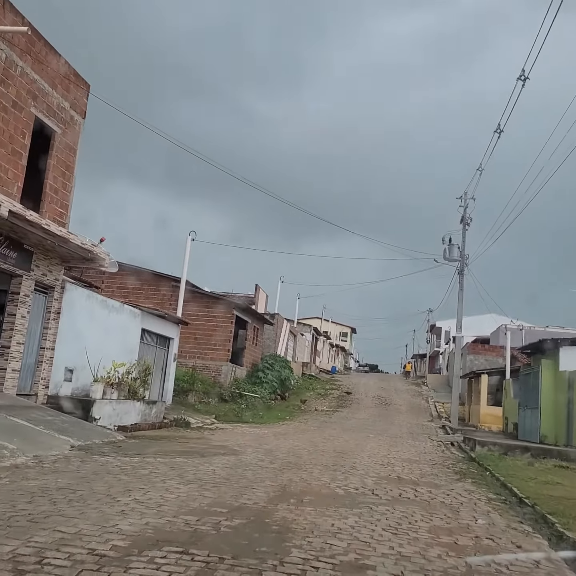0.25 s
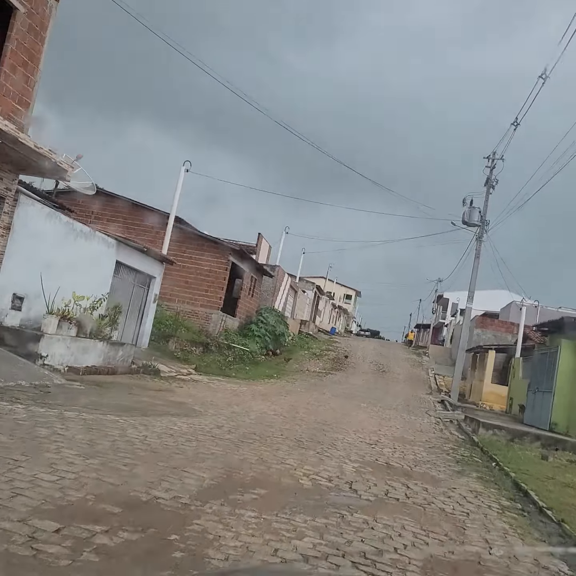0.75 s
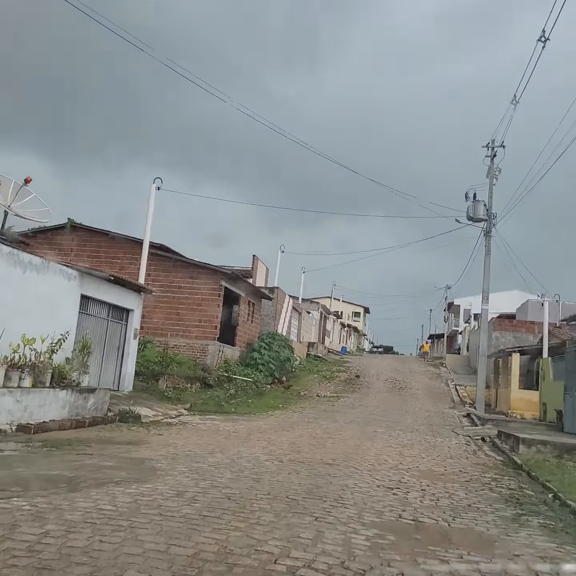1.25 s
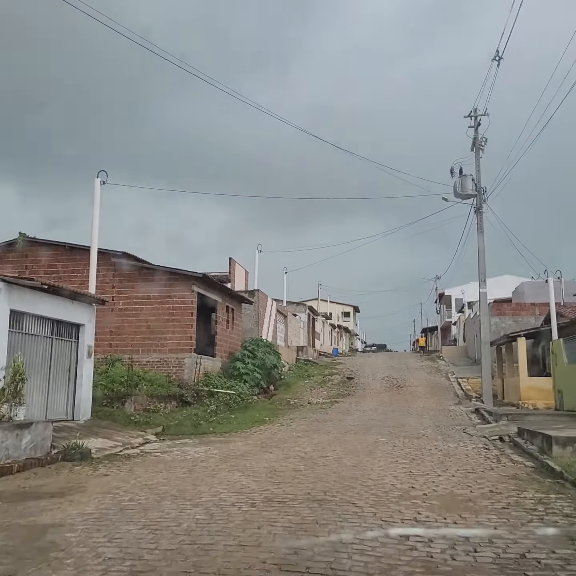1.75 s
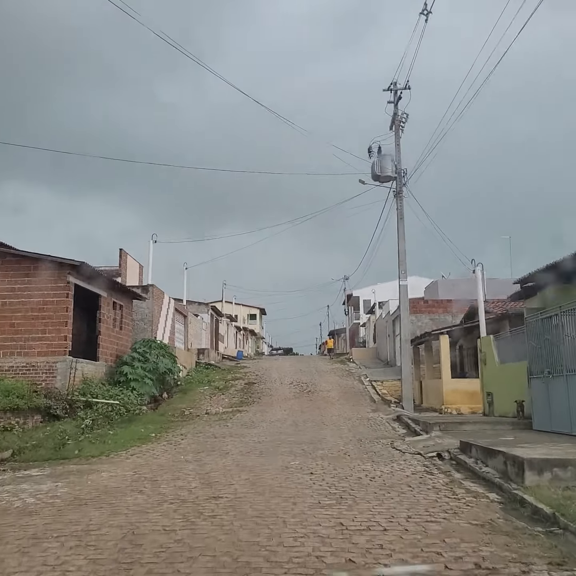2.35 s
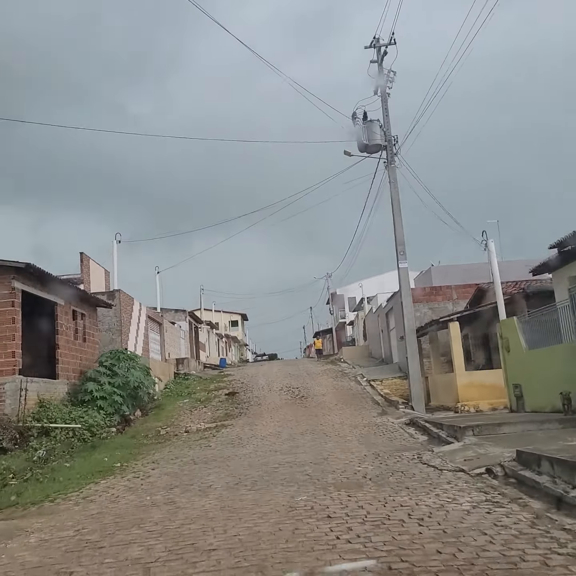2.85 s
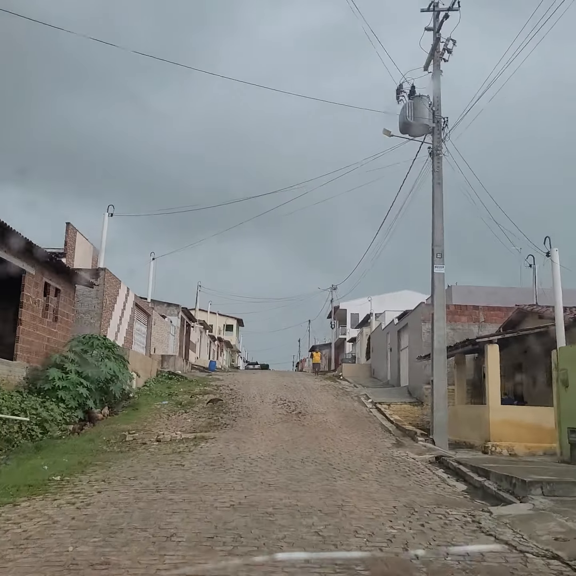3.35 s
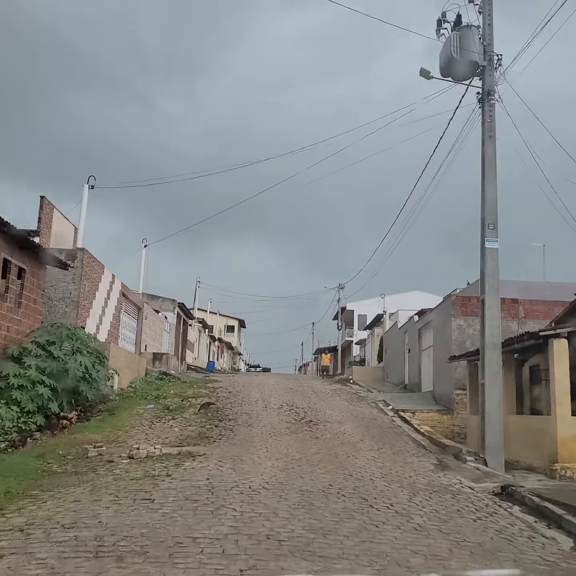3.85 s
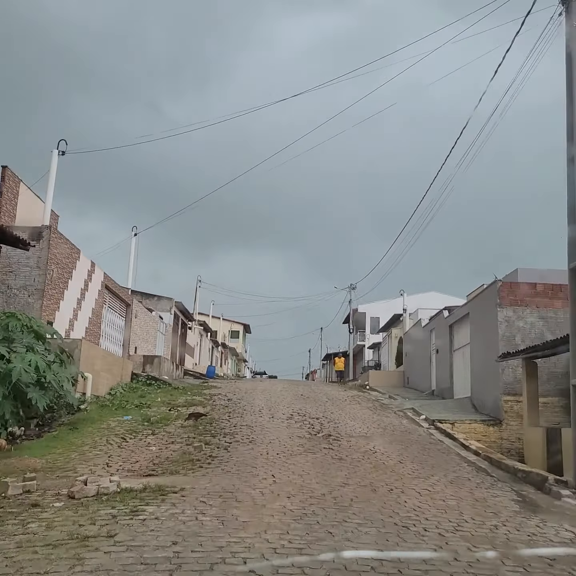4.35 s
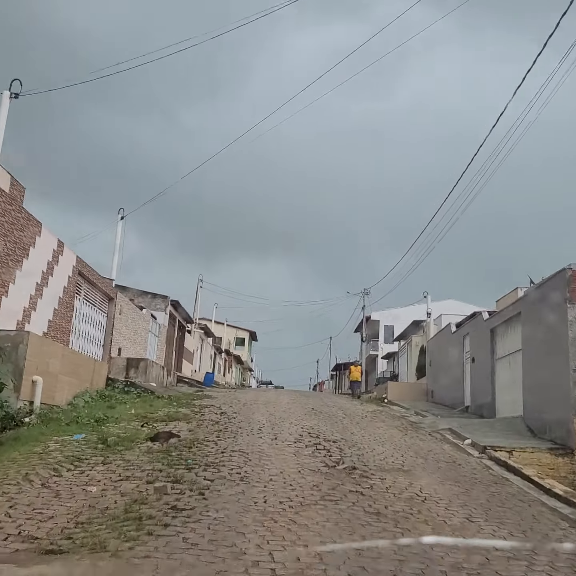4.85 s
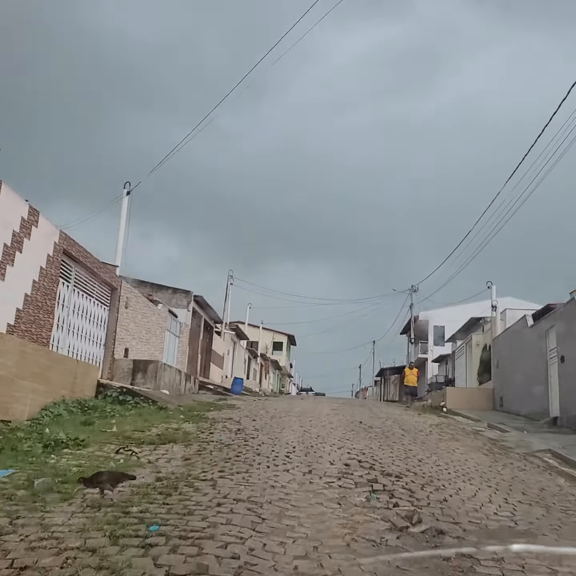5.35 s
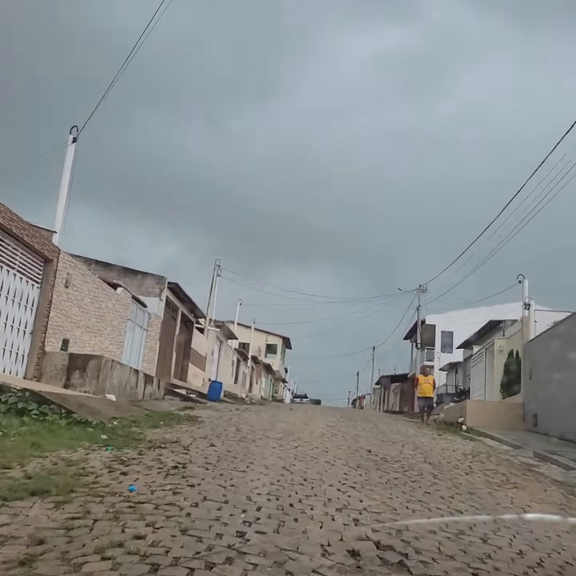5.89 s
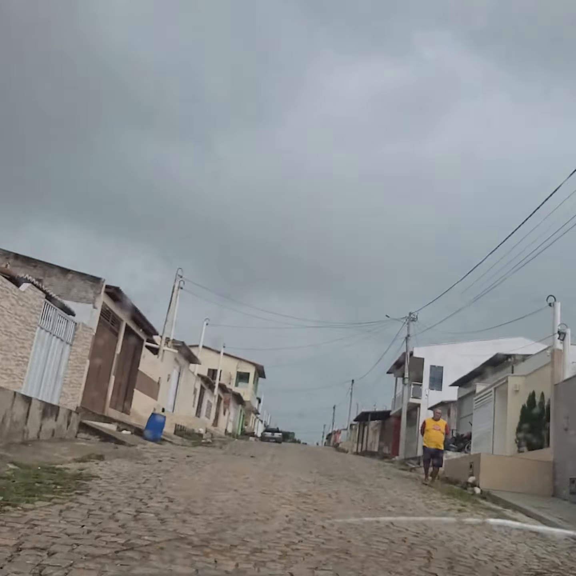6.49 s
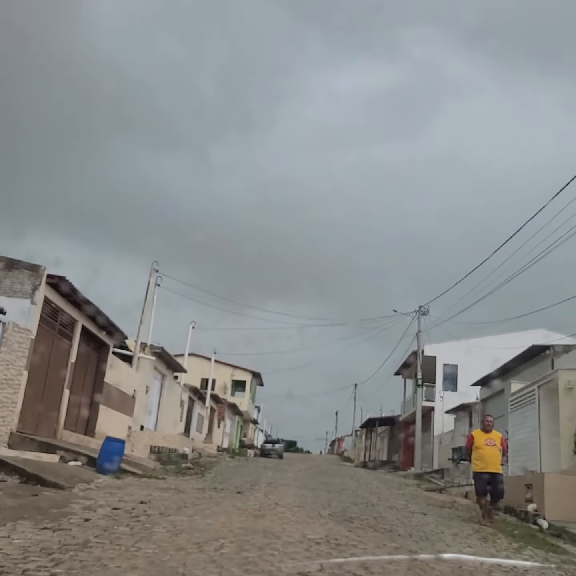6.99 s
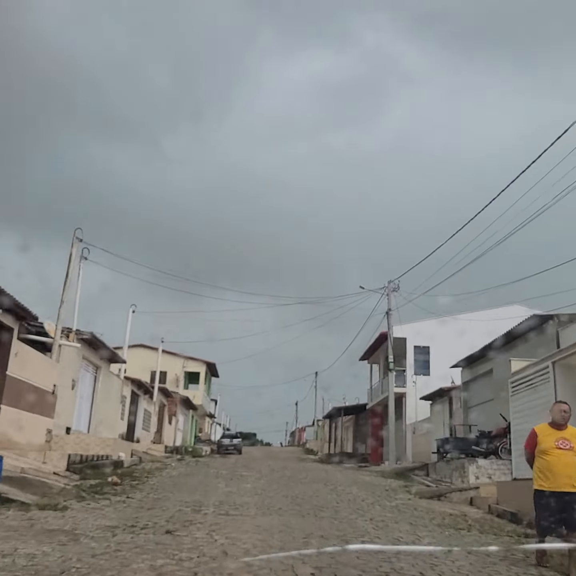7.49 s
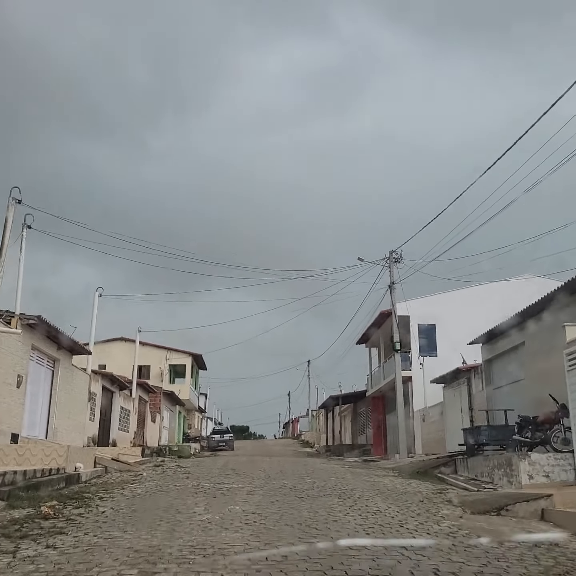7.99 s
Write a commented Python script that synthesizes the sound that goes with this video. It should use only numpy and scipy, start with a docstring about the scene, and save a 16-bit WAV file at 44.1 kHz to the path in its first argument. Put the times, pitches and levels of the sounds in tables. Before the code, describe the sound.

Inside a car crawling uphill over cobblestones: steady deep tyre rumble and cabin boom, with loose metal clinks, plastic rattles and occasional suspension thumps.

```python
"""Cobbles drum under four tyres and the closed cabin booms, heard from inside a car climbing at a steady crawl.
The boom swells over each hump; proud stones thump through suspension and floor, and tyres crunch off edges.
Rough patches set off bouts of rattling: a loose metal fitting on the right clinks in runs of separate taps,
a smaller part pings, and the plastic trim buzzes, ticks and squeaks. Two microphones pick it up.
Impulses and puffs of noise excite coloured filters and decaying modes; each squeak is a wavering sine."""
import sys
import numpy as np
from scipy import signal
from scipy.fft import rfft, irfft, next_fast_len
from scipy.io import wavfile
from scipy.ndimage import uniform_filter1d

SR = 44100
rng = np.random.default_rng(int(sys.argv[2]) if len(sys.argv) > 2 else 0)


def transcribe(u):
    """Save the signal u as a 16-bit wav file named by the first command-line argument.

    u: samples, shape (n,) or (channels, n), limited to [-1, 1]; the rate is SR.
    q: integer samples, one column per channel.
    """
    v = np.clip(np.atleast_2d(u).T, -1, 1)
    q = np.round(v * 32767).astype(np.int16)
    wavfile.write(sys.argv[1], SR, q)


N = 362943
TIME = np.arange(N) / SR  # s

# Roughness of the road under the tyres. Each row: time in seconds, drumming level in dB.
ROAD = [(0, -25), (.5, -27.5), (.65, -24), (.95, -28), (1.35, -23), (1.7, -28), (2.1, -24), (2.5, -27.5),
        (2.98, -21.5), (3.4, -26.5), (3.75, -23), (4.25, -22.5), (4.9, -24), (5.4, -24), (5.68, -27.5),
        (5.95, -21.5), (6.5, -22.5), (6.95, -26.5), (7.5, -25.5), (8.17, -23.5)]
# Humps in the paving that swell the cabin boom. Each row: centre in seconds, level in dB.
HUMPS = [(.1, -19), (0.261, -14.5), (.79, -18), (1.07, -18), (1.22, -15.5), (1.49, -13), (1.691, -14.5),
         (2.331, -16.5), (2.72, -13.5), (2.94, -14), (3.139, -12.5), (3.36, -14.5), (3.63, -17.5),
         (3.77, -14.5), (3.99, -14), (4.21, -12.5), (4.39, -11.5), (4.57, -12), (4.92, -13.5), (5.18, -13),
         (5.42, -14.5), (5.58, -18), (5.75, -13.5), (5.91, -13.5), (6.07, -12), (6.27, -12), (6.43, -13),
         (6.63, -15), (6.86, -14), (7.07, -13), (7.27, -17.5), (7.529, -16), (7.701, -15.5), (7.851, -12),
         (8.05, -14)]
# Cabin air boom. Each row: frequency in Hz, relative level in dB.
BOOM = [(12, -33.5), (23, -23), (36, -16), (46, -2.5), (55, 0.5), (65, -6.5), (79, -14), (105, -24.5)]
# Floor and body panels. Each row: frequency in Hz, relative level in dB.
BODY = [(60, -22.5), (95, -1.5), (134, 3), (176, -10), (232, -14.5), (284, -13.5), (380, -24), (600, -31),
        (760, -45.5), (1100, -56)]
# Road noise that has bounced around the cabin. Each row: frequency in Hz, relative level in dB.
ROAR = [(40, 3.5), (280, -3), (560, -8.5), (760, -13.5), (870, -11), (1200, -21), (3000, -29),
        (7000, -46.5)]
# Bouts of rattling, each set off by a patch of rough stones. Each row: start in seconds, length in seconds,
# trim buzz in dB, fine sizzle of rubbing panels in dB relative to the buzz (before SIZZLE_GAIN_DB).
RATTLES = [(.235, 0.067, -48.5, -21.5), (0.483, 0.14, -54.5, -25), (1.09, 0.1, -48.5, -23),
           (1.351, 0.093, -48.5, -24), (2.07, .1, -49.5, -28), (2.57, .22, -48, -31),
           (2.983, 0.18, -50, -27), (3.301, 0.15, -49.5, -30), (3.793, .15, -47, -29),
           (4.185, 0.17, -47, -22), (4.404, 0.065, -49.5, -24), (4.591, 0.21, -48.5, -23.5),
           (5.978, 0.2, -50, -26), (6.263, 0.14, -52, -28), (6.403, .12, -45.5, -26),
           (6.983, 0.27, -50.5, -26), (7.722, 0.21, -50, -28.5), (8.068, 0.1, -48, -25.5)]
# Buzzing plastic trim. Each row: frequency in Hz, relative level in dB.
TRIM = [(700, -2), (1400, 4.5), (2400, -4.5), (3200, -4.5), (3900, -8), (4500, -12), (6400, -15.5),
        (7400, -13.5), (8400, -28)]
# Fine sizzle of rubbing panels. Each row: frequency in Hz, relative level in dB.
SIZZLE = [(4000, -38), (8000, -9.5), (11000, -1.5), (16000, -6.5)]
# Hard contact. Each row: frequency in Hz, relative level in dB.
SNAP = [(600, -9.5), (1800, -3.5), (3100, 3.5), (3800, -3), (4300, -4.5), (5000, -4), (5900, -8),
        (6700, -12.5), (7500, -7), (8600, -14.5)]
# Plastic panels snapping together. Each row: start in seconds, relative level in dB, relative brightness in dB.
TICKS = [(0.38, -51, -8), (1.1087, -39.5, -28), (1.353, -43.5, -37), (1.4187, -41.5, -13),
         (3.124, -44, -14), (3.862, -43, -12), (4.047, -43, -28), (4.6526, -42, -34), (4.75, -45.5, -25),
         (6.11, -42, -34), (6.272, -41, -21), (6.495, -43, -22), (6.7337, -42.5, -16), (7.786, -45.5, -20)]
# Taps of the loose fitting on its seat. Each row: start in seconds, relative level in dB,
# relative hardness of the contact in dB.
CLINKS = [(.12, -38, -3.5), (0.137, -37.5, -5), (.207, -41, -1.5), (.239, -41.5, 2), (0.265, -43.5, 3.5),
          (0.306, -40, -4), (.836, -44.5, -0.5), (.873, -47.5, 0.5), (1.444, -38.5, -8), (1.467, -41, -5.5),
          (1.526, -47.5, -.5), (1.571, -38.5, -2), (1.592, -36.5, -1.5), (1.644, -35, -10.5),
          (1.658, -38, -13), (1.67, -36.5, -10), (1.685, -39.5, -5.5), (1.697, -41, -15), (1.72, -41, -9),
          (1.755, -44, -6), (1.894, -41.5, -23), (1.929, -40.5, -18), (1.956, -38, -13), (2.039, -37, -14),
          (2.083, -33.5, -7.5), (2.148, -30.5, -10.5), (2.165, -33, -4.5), (2.197, -37.5, -8),
          (2.24, -38, -19), (2.263, -38, -7), (2.482, -36, -10), (2.5, -41, -3), (2.568, -40.5, -7.5),
          (2.594, -36, -5.5), (2.666, -35, -4.5), (2.703, -34.5, -6), (2.734, -36, -9), (2.8, -40, -10.5),
          (2.923, -30.5, -9), (2.963, -37, -20), (2.994, -34.5, -12), (3.016, -29, -17.5), (3.086, -31, -8),
          (3.277, -39, -18), (3.332, -37.5, -17), (3.426, -36, -14.5), (3.521, -41, -10.5),
          (3.617, -44.5, -25), (3.67, -36, -8.5), (3.692, -33.5, -9), (3.716, -41, -4), (3.781, -39.5, -9),
          (3.806, -31, -8.5), (3.92, -42, -14), (4.118, -42.5, -6), (4.244, -34.5, -12.5), (4.28, -37, -9),
          (4.306, -38, -3), (4.568, -40.5, -11), (4.819, -38, -6), (4.914, -43.5, -2), (4.938, -37, -10),
          (5.129, -44.5, -1.5), (5.254, -44, -5), (5.412, -37, -2), (5.435, -37, -6), (5.518, -36.5, -10),
          (5.607, -38, -5.5), (5.771, -42, -8), (5.793, -38, -2), (6.013, -33.5, -5), (6.05, -36, 2),
          (6.128, -42, 2.5), (6.192, -39.5, -4.5), (6.306, -41.5, -2), (6.45, -39, -1.5),
          (6.502, -37.5, -4.5), (6.587, -43, -5.5), (6.608, -40, 0.5), (6.708, -42.5, -1), (6.8, -42, 0),
          (6.844, -40.5, -5.5), (6.9, -41.5, -6), (6.958, -44.5, -5), (7.017, -41, -5.5),
          (7.107, -37.5, -10), (7.33, -39, -6.5), (7.45, -37.5, -6.5), (7.475, -43, -4), (7.498, -41.5, -6),
          (7.645, -42.5, -3.5), (7.742, -36.5, -7), (7.895, -37, -12), (8.079, -37, -9), (8.108, -39, -5),
          (8.185, -41.5, -7)]
# Modes of the fitting. Each row: frequency in Hz, relative level in dB.
FITTING_MODES = [(1190, -3), (1245, 1), (1365, -7), (1610, -13), (1786, -11.5), (2010, -15), (2690, -6),
                 (3195, -3.5), (3730, -11.5), (4920, -13), (6072, -20), (7260, -20)]
# Pings of a smaller metal part. Each row: start in seconds, relative level in dB.
PINGS = [(0.787, -41), (1.625, -40)]
# Modes of the smaller part. Each row: frequency in Hz, relative level in dB.
PING_MODES = [(2283, -5), (4315, -6), (5820, -5.5), (7450, -13)]
# Left minus right level of the dashboard sounds. Each row: frequency in Hz, difference in dB.
DASH_PAN = [(1200, -5), (7200, -11), (8600, 1), (20000, -1.5)]
# Jolts from proud stones. Each row: start in seconds, suspension knock in dB, floor drum in dB, cabin boom in dB.
JOLTS = [(1.089, -12.5, -19.5, -23), (1.353, -18, -16, -7.5), (4.647, -22, -17.5, -2.5),
         (6.039, -37, -12.5, -25.5), (6.101, -26, -11, -22), (6.757, -40, -15, -19)]
# Suspension knock. Each row: frequency in Hz, relative level in dB.
KNOCK = [(70, -12.5), (125, -16.5), (170, -12.5), (225, 6), (275, 2), (350, -10), (430, -8.5), (620, -28)]
# Squeaks of the trim. Each row: start in seconds, length in seconds, pitch in Hz, level in dB.
SQUEAKS = [(1.352, .02, 9420, -55), (8.087, .02, 9300, -54)]
# A tyre scrubbing off a stone's edge. Each row: start in seconds, relative level in dB.
CRUNCHES = [(1.353, -24.5), (2.07, -28), (3.075, -25.5), (4.621, -21.5), (6.125, -21), (6.43, -23),
            (7.071, -31)]
# Tyre crunch. Each row: frequency in Hz, relative level in dB.
CRUNCH = [(200, -8.5), (500, 2), (1600, -12.5), (4000, -21)]

STONES_PER_S = 42  # under each tyre, from the median gap
# time from a swell's peak until its power falls to 1/e, and the boom between swells
HUMP_S, REST_BOOM_DB = .072, -27
# the boom at the left microphone against the right: phase lead, level
BOOM_LEAD_RAD, BOOM_PAN_DB = .43, -2.9
# a bout starts abruptly, sags and dies away
RATTLE_ATTACK_S, RATTLE_RELEASE_S, RATTLE_SAG_DB_PER_S = .0089, .0031, 9.5
# the panels only begin to rub once a bout is under way; a common lift of the sizzle
SIZZLE_ONSET_S, SIZZLE_GAIN_DB = .015, 10
# murmur between bouts (sizzle before SIZZLE_GAIN_DB), and dB of murmur per dB of drumming
REST_BUZZ_DB, REST_SIZZLE_DB, BUZZ_PER_DRUM, SIZZLE_PER_DRUM = -55, -83.5, .38, 1.2
# slaps of the fluttering panels: rate from the median gap, unevenness in dB
SLAPS_PER_S, SLAP_SCATTER_DB = 90, 2.2
RING_T60_S, CRACK_T60_S, BUZZ_T60_S = .07, .028, .05
RING_DB, CRACK_DB = -2.2, -1.5
CHATTER_DB = 7.5  # loudest light chatter above the trim buzz
# a tap's bounces: when the seat starts to choke the ring, how fast, gain from one bounce to the next
TAP_S, CHOKE_S, BOUNCE_DB = .017, .009, -2
# spread from tap to tap, reached in full by modes from 2500 Hz up: tuning (share), strength
SEAT_DETUNE, SEAT_SCATTER_DB = .018, 2.5
PING_T60_S, PING_CRACK_DB = .042, 6
SHUDDER_S = .0077  # between a shuddering tyre's blows on the floor
# body panels rumbling on after a knock: decay, level against the knock
PANEL_T60_S, PANEL_DB = .45, -39
CRUNCH_T60_S = .38
TOP_HZ = 15800


def undb(db):
    """Decibels to gain."""
    return 10 ** (np.asarray(db) / 20)


def unit(x):
    """Scale to rms 1."""
    return x / np.sqrt(np.mean(x ** 2))


def pan(db):
    """Left and right gains for a left-minus-right level difference."""
    return undb(np.array([[db], [-db]]) / 2)


def colour(x, points):
    """Causal minimum-phase filter through the (Hz, dB) points, falling steeply above the last one."""
    size = next_fast_len(N + SR // 2, True)
    hz, db = np.transpose(points)
    f = np.maximum(np.arange(size // 2 + 1) * SR / size, 1)
    fall_db = np.minimum(24 * np.log2(np.maximum(f / hz[-1], 1)), 100)
    response_db = np.interp(np.log(f), np.log(hz), db) - fall_db
    # folding the cepstrum onto positive times makes the filter causal
    cepstrum = irfft(np.log(undb(response_db)))
    cepstrum[1:size // 2] *= 2
    cepstrum[size // 2 + 1:] = 0
    response = np.exp(rfft(cepstrum))
    return irfft(rfft(x, size) * response)[..., :x.shape[-1]]


def steady(x, span_s):
    """Even out swells slower than span_s, to about rms 1."""
    power = np.mean(np.atleast_2d(x) ** 2, axis=0)
    local_power = np.abs(uniform_filter1d(power, int(span_s * SR)))
    return x / np.sqrt(local_power + 1e-12)


def blows(times, sizes):
    """A track of single impulses."""
    return np.bincount(np.clip(times * SR, 0, N).astype(int), sizes, N + 1)[:N]


def scrape(x, t60):
    """Every contact grinds briefly: a dying puff of fresh noise at each microphone."""
    keep = undb(-60 / (t60 * SR))
    power = signal.lfilter([1], [1, -keep ** 2], x ** 2)
    return np.sqrt(power) * rng.standard_normal((2, N))


def standing(x):
    """The cabin's standing wave reaches the left microphone weaker and a little early."""
    lead = np.exp(1j * np.array([[BOOM_LEAD_RAD], [0]]))
    return pan(BOOM_PAN_DB) * np.real(signal.hilbert(x) * lead)


def cobbles(scatter_db):
    """Each of four tyres meets an uneven row of stones, stepping up or down at every joint."""
    gap, step, strength = np.moveaxis(rng.standard_normal((4, 600, 3)), -1, 0)
    times = np.cumsum(np.exp(.35 * gap), axis=1) / STONES_PER_S - .1
    sizes = np.sign(step) * undb(scatter_db * strength) * (times > 0)
    return blows(times.ravel(), sizes.ravel())


def heaves():
    """Level of the cabin boom in dB: it swells and falls back each time the car rides over a hump."""
    swells = sum(undb(db) ** 2 * np.exp(-((TIME - s) / HUMP_S) ** 2) for s, db in HUMPS)
    return 10 * np.log10(undb(REST_BOOM_DB) ** 2 + swells)


def tyres(boom_db, drum_db):
    """Stone blows drive the cabin's lowest air mode and the floor panels; the tread scuffs on every stone."""
    boom = steady(colour(cobbles(scatter_db=4.5), BOOM), span_s=.11)
    drum = steady(colour(cobbles(scatter_db=2), BODY), span_s=.14)
    scuffs = scrape(cobbles(scatter_db=7), t60=.24)
    roar = steady(colour(scuffs, ROAR), span_s=.3)
    road = pan(-.1) * drum + undb(-13.5) * roar
    return standing(boom * undb(boom_db)) + road * undb(drum_db)


def shaking(drum_db):
    """Buzz and sizzle levels in dB: bouts of rattling over a murmur that grows as the tyres drum harder."""
    rough_db = drum_db - drum_db.mean()
    buzz = undb(REST_BUZZ_DB + BUZZ_PER_DRUM * rough_db) ** 2
    sizzle = undb(REST_SIZZLE_DB + SIZZLE_PER_DRUM * rough_db) ** 2
    for s, length, buzz_db, sizzle_db in RATTLES:
        age = np.clip(TIME - s, 0, 1)
        attack = np.minimum(age / RATTLE_ATTACK_S, 1)
        release = np.exp(-np.maximum(age - length, 0) / RATTLE_RELEASE_S)
        sagging_db = buzz_db - RATTLE_SAG_DB_PER_S * (age - length / 2)
        power = (attack * release * undb(sagging_db)) ** 2
        rubbing = undb(sizzle_db) * (1 - np.exp(-age / SIZZLE_ONSET_S))
        buzz = buzz + power
        sizzle = sizzle + power * rubbing ** 2
    return 10 * np.log10(buzz), 10 * np.log10(sizzle)


def flutter():
    """Loose panels slap at uneven moments; each slap jumps up and dies away."""
    gap, size = rng.standard_normal((900, 2)).T
    times = np.cumsum(np.exp(.5 * gap)) / SLAPS_PER_S
    slaps = blows(times, undb(SLAP_SCATTER_DB * size))
    keep = undb(-60 / (.07 * SR))  # T60 of 0.07 s
    power = signal.lfilter([1], [1, -keep ** 2], slaps ** 2)
    return np.sqrt(.2 + power)


def trim(buzz_db, sizzle_db):
    """Plastic panels touch in countless tiny clicks of uneven size, and now and then snap loudly."""
    count = 5000
    times = rng.random(count) * N / SR
    sizes = undb(1.7 * np.minimum(rng.exponential(size=count), 4))
    clicks = scrape(blows(times, sizes), BUZZ_T60_S)
    contacts = steady(clicks * flutter(), span_s=.08)
    buzz = unit(colour(contacts, TRIM)) * undb(buzz_db)
    sizzle = unit(colour(contacts, SIZZLE)) * undb(sizzle_db + SIZZLE_GAIN_DB)
    s, tick_db, bright_db = np.transpose(TICKS)
    snap = colour(scrape(blows(s, undb(tick_db)), t60=.055), SNAP)
    edge = colour(scrape(blows(s, undb(tick_db + bright_db)), t60=.028), SIZZLE)
    return buzz + sizzle + undb(8.5) * snap + undb(11) * edge


def bouncing(t, lags, t60):
    """Envelope of a few quick bounces, each weaker than the last, their decays summed as power."""
    power = 0
    for k, lag in enumerate(lags):
        decay_db = k * BOUNCE_DB - 60 * np.abs(t - lag) / t60
        power = power + (t >= lag) * undb(decay_db) ** 2
    return np.sqrt(power)


def tap(level_db, hard_db):
    """The fitting bounces, cracking and ringing in a colour that varies per tap, until its seat chokes it."""
    hz, db = np.transpose(FITTING_MODES)[..., None]
    t = TIME[:SR // 20]
    detune, favour = rng.standard_normal((2, len(hz), 1))
    lags = np.r_[0, np.cumsum(rng.uniform(.003, .007, 3))]
    choke = np.exp(-np.maximum(t - TAP_S, 0) / CHOKE_S)
    # a harder contact feeds the high modes more; they also vary most from tap to tap
    spread = np.clip(hz / 2500, 0, 1) ** 2
    gain = undb(db + (hz > 1500) * hard_db + SEAT_SCATTER_DB * spread * favour)
    # each mode has its own phase, a quarter turn apart at the two microphones
    paths = rng.uniform(0, 2 * np.pi, hz.shape) + np.array([[[0]], [[np.pi / 2]]])
    tuned_hz = hz * (1 + SEAT_DETUNE * np.sqrt(spread) * detune)
    onset = 1 - np.exp(-t * hz / 2)
    modes = np.sum(gain * onset * np.sin(2 * np.pi * tuned_hz * t + paths), axis=1)
    ring = modes * bouncing(t, lags, RING_T60_S)
    crack = undb(hard_db) * bouncing(t, lags, CRACK_T60_S) * rng.standard_normal((2, len(t)))
    return undb(level_db) * choke * np.array([undb(RING_DB) * ring, undb(CRACK_DB) * crack])


def fitting(buzz_db):
    """Separate firm taps of metal on its seat, with light chatter that follows the trim's buzz."""
    light = []
    for place, weakness in rng.random((130, 2)):
        level_db = buzz_db[int(place * N)] + CHATTER_DB - 10 * weakness
        light.append((place * N / SR, level_db, -4))
    out = np.zeros((2, 2, N + SR))  # ring and crack, each at two microphones
    for s, level_db, hard_db in [*light, *CLINKS]:
        sound = tap(level_db, hard_db + 1.5)
        start = int(s * SR)
        out[..., start:start + sound.shape[-1]] += sound
    ring, crack = out[..., :N]
    return ring + colour(crack, SNAP)


def pings():
    """A smaller metal part gives a short crack and a few high modes that die together."""
    s, level_db = np.transpose(PINGS)
    hits = blows(s, undb(level_db))
    t = TIME[:SR // 8]
    modes = sum(undb(db) * np.sin(2 * np.pi * (hz * t + rng.random((2, 1)))) for hz, db in PING_MODES)
    ring = modes * undb(-60 * t / PING_T60_S)
    crack = colour(scrape(hits, CRACK_T60_S), SNAP)
    return signal.oaconvolve(hits[None], ring, axes=1)[:, :N] + undb(PING_CRACK_DB) * crack


def from_dash(x):
    """The right microphone faces the dashboard; the left one is shaded in the middle range."""
    left, right = x
    left = colour(left, [(hz, db / 2) for hz, db in DASH_PAN])
    right = colour(right, [(hz, -db / 2) for hz, db in DASH_PAN])
    return np.array([left, right])


def struck(hits, part):
    """A part's response to blows, scaled so that a single unit impulse peaks at 1."""
    kick = blows(np.zeros(1), np.ones(1))
    return colour(hits, part) / np.abs(colour(kick, part)).max()


def jolts():
    """A proud stone knocks through the suspension, rebounds once, shudders the floor and pumps the cabin air."""
    s, knock_db, drum_db, boom_db = np.transpose(JOLTS)
    first = blows(s + .003, undb(knock_db - 2))
    rebound = blows(s + .01, undb(knock_db))
    knock = struck(first + rebound, KNOCK)
    # the tyre shudders as it rolls over the stone
    shudder = 0
    for k, size in enumerate((.81, .98, 1, .92)):
        shudder = shudder + blows(s + k * SHUDDER_S, undb(drum_db)) * size
    # the rubber spreads each blow over a few milliseconds
    drum = struck(uniform_filter1d(shudder, size=110), BODY)
    rumble = scrape(blows(s, undb(knock_db + PANEL_DB)), PANEL_T60_S)[0]
    panels = struck(rumble, KNOCK)
    boom = struck(blows(s, undb(boom_db)), BOOM)
    return knock + panels + drum + standing(boom)


def squeaks():
    """Short slips of plastic on plastic: a thin, unsteady whistle, stronger at the left microphone."""
    out = 0
    for s, length, hz, db in SQUEAKS:
        waver = unit(uniform_filter1d(rng.standard_normal(N), size=60))
        swell = np.sin(np.pi * np.clip((TIME - s) / length, 0, 1))
        phase = 2 * np.pi * np.cumsum(hz * (1 + .014 * waver)) / SR
        out = out + undb(db) * swell * np.sin(phase)
    return pan(13) * out


def crunches():
    """A tyre scrubs off the edge of a stone: a coarse, grainy burst."""
    s, level_db = np.transpose(CRUNCHES)
    burst = scrape(blows(s, undb(level_db)), CRUNCH_T60_S)
    grain = steady(flutter(), CRUNCH_T60_S)
    return colour(burst * grain, CRUNCH)


def scene():
    """Road rumble from below, rattles from the dashboard."""
    drum_db = np.interp(TIME, *np.transpose(ROAD))
    buzz_db, sizzle_db = shaking(drum_db)
    road = tyres(heaves(), drum_db) + jolts() + crunches()
    dash = trim(buzz_db, sizzle_db) + fitting(buzz_db) + pings()
    return road + from_dash(dash) + squeaks()


def record(dry):
    """The phone cuts the top: a steep low-pass at both microphones."""
    top_cut = signal.ellip(10, .2, 80, TOP_HZ, fs=SR, output="sos")
    return signal.sosfilt(top_cut, dry)


dry = scene()
out = record(dry)
transcribe(out)
```